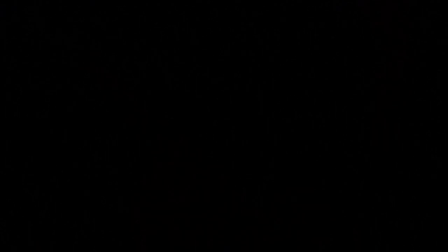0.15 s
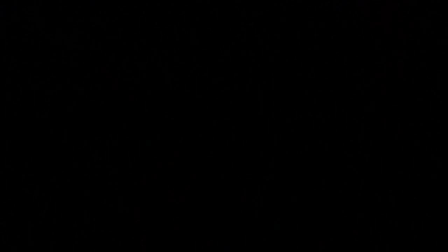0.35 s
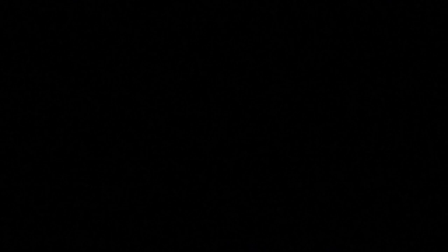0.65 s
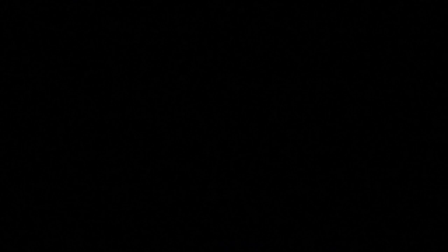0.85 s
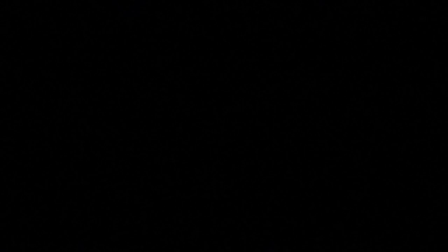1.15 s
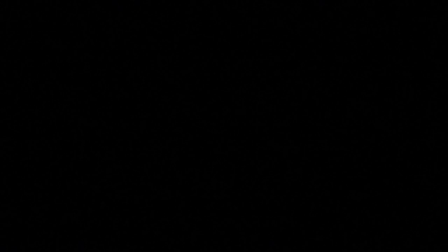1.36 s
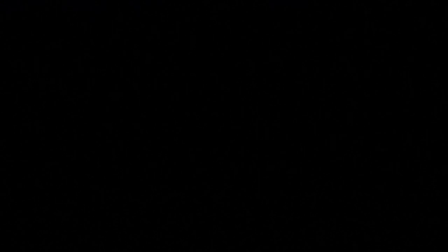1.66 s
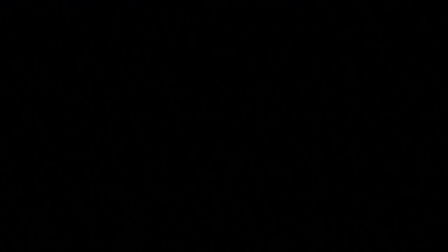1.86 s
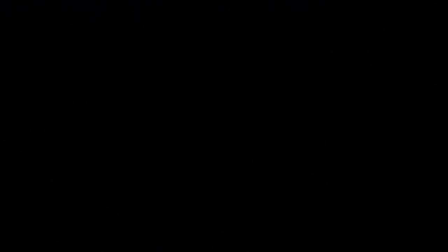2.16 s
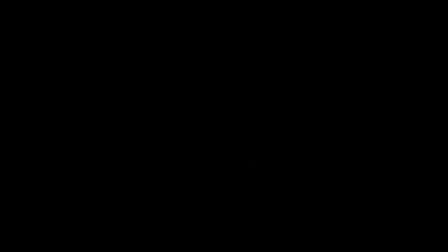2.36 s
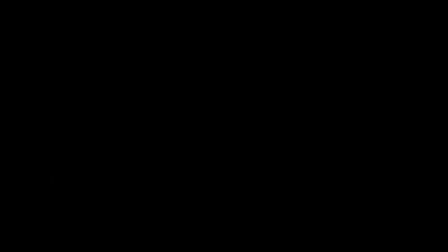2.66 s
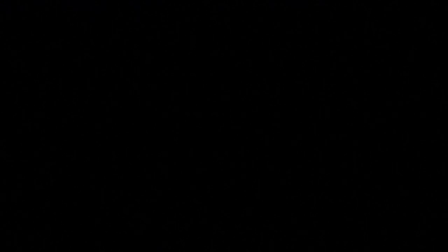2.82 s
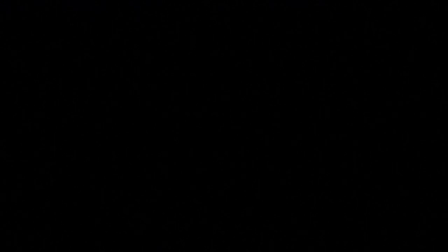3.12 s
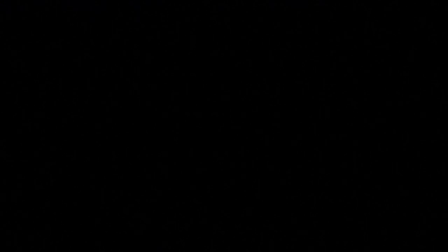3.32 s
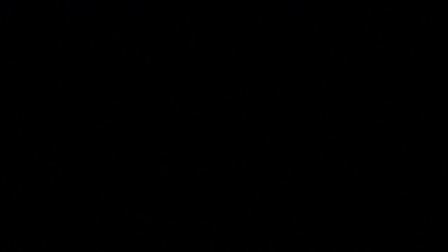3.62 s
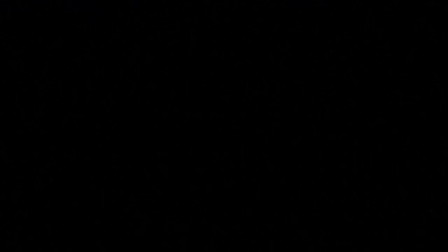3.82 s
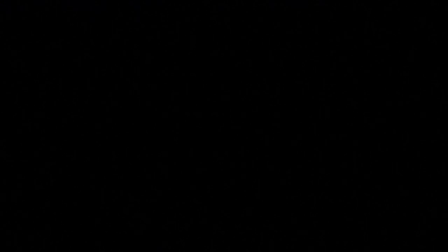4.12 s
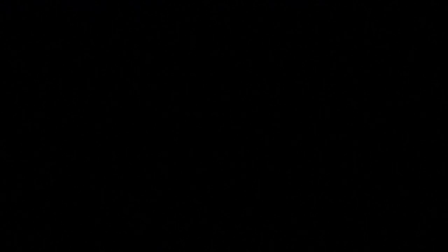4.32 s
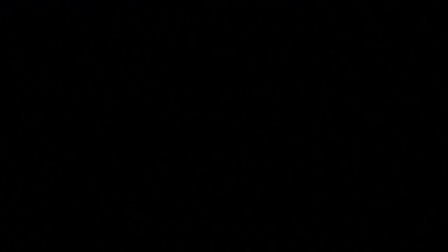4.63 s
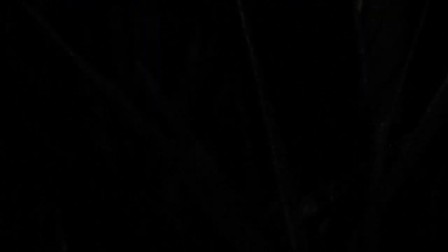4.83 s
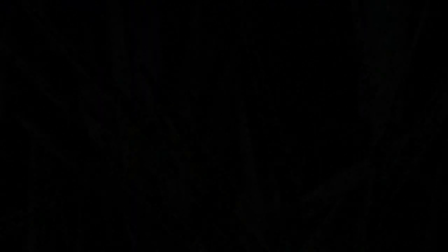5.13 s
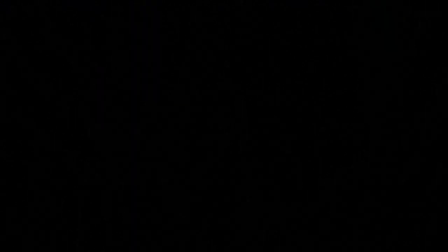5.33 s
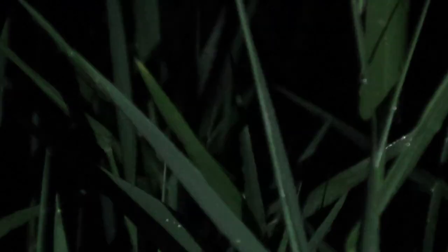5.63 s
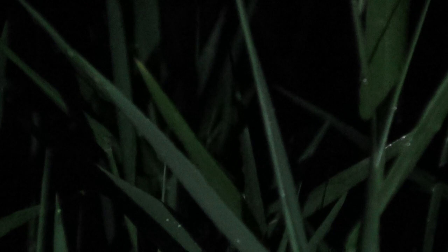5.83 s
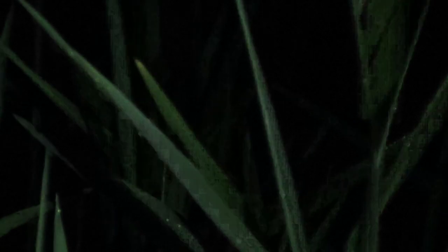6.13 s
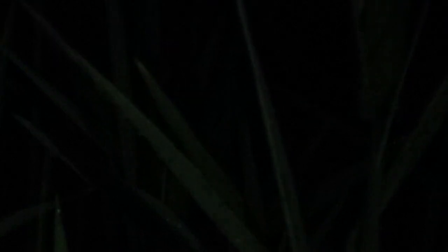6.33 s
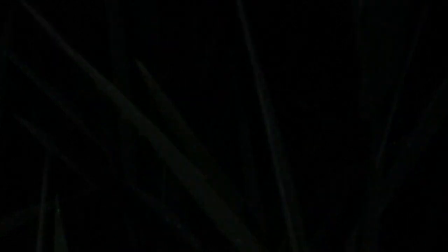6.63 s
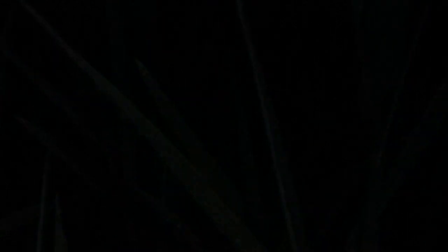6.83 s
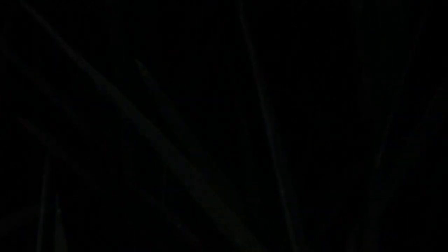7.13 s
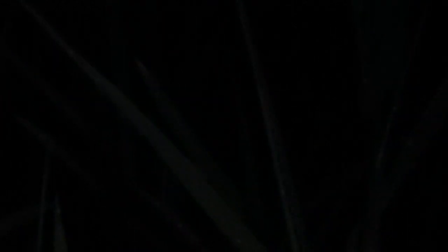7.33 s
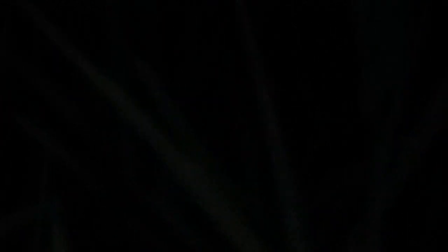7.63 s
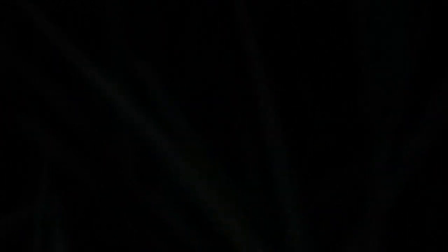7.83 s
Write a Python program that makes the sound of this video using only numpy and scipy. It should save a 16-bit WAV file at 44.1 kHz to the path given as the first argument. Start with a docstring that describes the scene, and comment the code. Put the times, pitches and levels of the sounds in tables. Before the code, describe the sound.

A frog chorus outdoors in the dark, heard from among the grass blades. Bursts of bright, dry clicking alternate with thinner moments of knocks, faint creaks and distant croaks. Two rounder, stronger knocks come around two seconds; busy click clusters follow, the last past seven seconds. Continuous high insect shimmer, small double cricket chirps, soft grass brushes and a weak distant engine drone surround them in wide, natural stereo.

```python
"""Frog chorus in wet grass at night: two-toned knocks (cord snaps, then a short harmonic tone), sharp
clicks alone and in rattles (short tone bursts), whoops and squeaks (gliding partials), creaks, rasps,
chirps and far calls (cord pulses ringing throat resonances), with echoes off the banks. Insects trill above
(throbbing noise bands, paired cricket tones); traffic, an engine sine and a late higher hum lie below,
among air and grass noise."""
import sys
import numpy as np
from scipy import signal
from scipy.fft import rfft, irfft
from scipy.io import wavfile

SR = 44100
rng = np.random.default_rng(int(sys.argv[2]) if len(sys.argv) > 2 else 0)


def materialize(psi):
    """Save the field psi as 16-bit PCM at rate SR to the path in sys.argv[1].

    A 1-D psi becomes a single channel; in a 2-D psi each row is a channel.
    """
    bounded = np.clip(np.atleast_2d(psi).T, -1, 1)
    quanta = np.round(bounded * 32767).astype(np.int16)
    wavfile.write(sys.argv[1], SR, quanta)


N = 351477

# night air spectrum: freq_hz, relative_db
AIR_SPECTRUM = [(200, -45), (300, -8.5), (630, -6), (1000, 1.5), (1500, -7), (2400, -6.5), (3300, -9.5),
                (4450, 1), (6500, 2.5), (8000, -7), (9500, -13), (12500, -16), (16000, -21)]
AIR_DB = -44
# stereo difference in noise: freq_hz, share of the common part
STEREO_DIFFERENCE = [(60, .03), (300, 0.1), (3000, 0.25), (8000, 0.27), (12000, 0.01)]
# steady insects: center_hz, width_hz, level_db, throb_hz, throb_depth (0-1), silent_from_s
INSECTS = [(5340, 440, -49, 83.0, 0.65, 9), (5920, 910, -49, 93, 0.5, 9), (5780, 1170, -52, 83.0, 0, 9),
           (7050, 110, -54.5, 50, 0.1, 9), (8410, 660, -51, 66, 0.2, 3.55), (10950, 1200, -63, 110, 0.6, 9),
           (3550, 860, -49, 25, 0.28, 9)]
# traffic spectrum: freq_hz, relative_db
TRAFFIC_SPECTRUM = [(12, -48), (20, -14), (32, -37), (54, -4), (128, -4), (161, -2), (300, -13.5),
                    (390, -81), (660, -120)]
# traffic loudness: time_s, level_db
TRAFFIC_LEVEL = [(0, -53), (.47, -57), (1.11, -52.5), (1.6, -56.5), (2.8, -47), (3.7, -52), (4.44, -49),
                 (5.5, -51), (6.3, -56), (7.4, -59), (7.97, -56.5)]
# far engine note, then a separate higher hum from 7.79 s: time_s, pitch_hz, level_db
ENGINE_THEN_HUM = [(0, 176.5, -60), (1.11, 169, -50), (1.55, 167.5, -56), (1.91, 167.5, -55),
                   (2.2, 166, -87), (2.751, 163.5, -61), (3.68, 162.6, -50), (3.75, 161.9, -71),
                   (4.15, 161, -74), (4.44, 160.2, -53.5), (5.52, 148.8, -56), (6.08, 147.5, -53.5),
                   (6.25, 144.9, -63), (7.35, 129.4, -59.5), (7.64, 117.6, -62), (7.75, 117.5, -78),
                   (7.79, 184.5, -61), (7.97, 186, -57)]
DRONE_HZ, DRONE_WIDTH_HZ, DRONE_DB = 65, 9.7, -61.5
# grass rustle spectrum: freq_hz, relative_db
RUSTLE_SPECTRUM = [(200, -55), (300, -5), (650, -9), (1500, -10.5), (4000, -31)]
RUSTLE_DB = -60
# brushes through the grass: start_s, length_s, level_db
SWISHES = [(.55, 0.46, -52), (3.15, 0.58, -50), (3.897, 0.183, -42.5), (5.396, 0.87, -55.5)]
WHINE_HZ, WHINE_DB = 15734, -74
# single clicks: time_s, level_db, pitch_hz, nominal_ms, left_right_db
CLICKS = [(0.0171, -25, 2600, 1.1, 6), (.2822, -14, 3050, 1.9, 5), (.314, -17.5, 3040, 8, 11),
          (1.062, -27, 2620, 2.0, 3), (1.199, -12, 2790, 1.2, 0), (1.2656, -16, 2680, 1.6, -3),
          (2.421, -14, 2980, 4.8, 11), (2.453, -11, 3030, 6, 11), (2.613, -12, 2920, 3.4, 8),
          (2.6413, -11.5, 3014, 8.5, 3), (3.5546, -13, 3230, 3.7, 4.5), (4.132, -23, 2570, 4.9, 7),
          (4.1439, -11.5, 2910, 3, 9), (4.1503, -14.5, 3300, 0.96, 1), (4.228, -15, 2790, 5.7, 6),
          (4.2823, -11.5, 2880, 3.6, 8), (4.3, -12.5, 2990, 9, 4), (5.4677, -28, 2700, 1.95, 9),
          (5.5997, -9, 3000, 1.9, 6), (5.6352, -12.5, 2940, 1.3, 8), (5.7637, -20, 2570, 3.6, 5),
          (6.615, -24.5, 2600, 3.2, 8), (6.6322, -13, 2780, 4.7, 8), (6.9234, -29.5, 2550, 4.4, 2),
          (7.2481, -17, 2455, 2.1, 2), (7.407, -26, 2950, 2.5, 0)]
# even runs of clicks: first_s, last_s, count, first_db, last_db, first_hz,
# first_nominal_ms, last_nominal_ms, left_right_db
RATTLES = [(0.227, 0.2727, 5, -14.5, -14.5, 2745, 5.5, 5.4, -2),
           (0.342, .3903, 6, -22, -13.5, 2910, 4.5, 6, -.5),
           (1.2194, 1.242, 3, -11, -20, 2900, 1.9, 4.2, -1),
           (1.2854, 1.306, 3, -12.5, -12, 2780, 3.1, 4, -2.3),
           (1.33, 1.3723, 5, -11, -11.5, 2900, 6.5, 5.5, 1.8),
           (1.3142, 1.3246, 2, -15, -11, 2880, 4.5, 3, 13),
           (1.446, 1.457, 2, -17.5, -12.5, 2880, 6.3, 7.3, -1),
           (1.478, 1.485, 2, -8, -10.5, 2954, 3.8, 7.3, -1),
           (1.798, 1.871, 7, -21.5, -27, 2850, 1.0, 2.3, 8),
           (2.3714, 2.4135, 5, -15, -13.5, 2690, 2.4, 4.7, 7.5),
           (2.464, 2.5195, 6, -21, -11, 2890, 5.2, 6, 6), (2.913, 2.974, 6, -30, -29.5, 2820, 2, 3.1, 8),
           (3.5243, 3.5344, 2, -21, -19, 2900, 1.7, 1.5, 7),
           (4.1586, 4.17, 2, -16.5, -14.5, 2985, 9.9, 8.7, 7),
           (4.192, 4.202, 2, -19, -18, 3260, 2.6, 2.1, 4), (5.742, 5.75, 2, -19, -14, 2890, 5.6, 7, 6.5),
           (5.7687, 5.7797, 2, -11.5, -12.5, 2965, 6.3, 6.2, 5),
           (5.793, 5.801, 2, -21, -21, 2910, 4.3, 3.3, -1),
           (7.0972, 7.1865, 9, -9, -12.5, 2750, 1.6, 6.4, -1.5),
           (7.275, 7.2827, 2, -12, -8.5, 2926, 5.1, 3.9, -1),
           (7.299, 7.32, 3, -13, -11, 2963, 7.4, 7.6, -1.3)]
RATTLE_CLIMB_HZ = 31.4   # per click
ECHO_T60_S, ECHO_DB, SLAP_S, SLAP_DB = 0.35, -10, 0.031, -26
# creaks: start_s, middle_s, end_s, start_db, middle_db, end_db,
# first_pulses_per_s, last_pulses_per_s, first_throat_hz, left_right_db, roughness
CREAKS = [(.02, 0.107, 0.22, -35.5, -22.5, -27.5, 425.5, 439.6, 2760, 5.3, 1.01),
          (1.075, 1.16, 1.243, -29, -23, -27, 408.6, 398, 2686, 5, .75),
          (2.22, 2.318, 2.41, -41.5, -35, -41, 432, 420, 2690, 8.5, 1.1),
          (3.01, 3.185, 3.42, -43.5, -36.5, -41, 340.5, 174.7, 2970, 7, 1.1),
          (3.9, 3.99, 4.15, -30, -23.5, -41, 420, 392, 2796, 7.3, 1.03),
          (5.48, 5.509, 5.57, -32.5, -27, -27, 476.6, 473.3, 2740, 9.5, 0.57),
          (5.549, 5.602, 5.68, -23, -28, -36, 418.7, 403, 2840, 6.3, 0.34),
          (5.655, 5.701, 5.745, -37.5, -36.5, -29, 173.7, 169, 2680, 3.6, 1.1),
          (6.335, 6.415, 6.45, -44, -30.5, -35, 384, 431.6, 2620, 9, 0.95),
          (6.435, 6.5, 6.56, -32, -38, -53, 211.5, 189.3, 2856, 7, 1),
          (7.61, 7.82, 8.06, -43.5, -37, -41, 329.4, 351, 2980, 6.8, 1.04)]
# creak resonances: multiple of throat_hz, width_hz, level_db
CREAK_RING = [(1.0, 349, 1.5), (.71, 200, -12.5), (.85, 110, -13)]
CREAK_CLIMB_HZ_PER_S = 1340
CREAK_JITTER, CREAK_ROUGH_DB = .03, 2.5   # at roughness 1; jitter is a share of the pulse interval
# whoops and pips: start_s, level_db, start_hz, target_hz, length_ms, overtone_db, left_right_db
WHOOPS = [(.045, -30.5, 708, 1055, 54, 5, -2), (.125, -28.5, 698, 1010, 51, -12, 4),
          (.655, -30, 728, 970, 51, -12, 5), (1.385, -42.5, 670, 687, 36, -20, 3),
          (3.094, -29.5, 702, 984, 60, -12, 4), (3.53, -31, 690, 1026, 41, -3, -2),
          (7.767, -35, 990, 1060, 8.7, -31, 5), (7.859, -28.5, 1125, 1164, 11.5, -30, 2),
          (7.95, -26.5, 1130, 1180, 12.5, -29, 2)]
# rasp curves: time_s, level_db, pulses_per_s, throat_hz, left_right_db
RASPS = [
    [(.045, -33, 148, 3980, 4), (.12, -33, 104, 4250, 3), (.2, -26.5, 136, 4460, 3.1),
     (.27, -26, 160.7, 4570, 4), (.33, -24.5, 269, 4870, 3.5), (.42, -24.5, 238.9, 5130, 3.2),
     (.445, -21.5, 347, 5140, 3.3), (.535, -24, 330, 5340, 3), (.554, -22.5, 404, 4855, 3.1)],
    [(.627, -31, 320, 4360, 3.5), (.638, -20, 320, 5130, -2), (.648, -21.5, 312, 5290, 0)],
]
# rasp resonances: multiple of throat_hz, width_hz, level_db
RASP_RING = [(1.017, 434, 1), (0.518, 254, -10), (0.816, 250, -12.5), (1.17, 600, -9.5), (1.87, 790, -17.5),
             (2.1, 1300, -22)]
# high chirps: start_s, peak_s, level_db at the peak
HIGH_CHIRPS = [(.262, .32, -26), (.965, 1.001, -41), (1.325, 1.39, -27.5), (4.142, 4.197, -26)]
# chirp onset: db_re_peak, pulses_per_s, throat_hz
CHIRP_START = (-8, 240, 5350)
# chirp from its peak on: s_after_peak, db_re_peak, pulses_per_s, throat_hz
CHIRP_FALL = [(0, 0.5, 330, 5950), (.04, -10, 340, 6050), (.09, -21, 340, 6050)]
# chirp resonances: multiple of throat_hz, width_hz, level_db
CHIRP_RING = [(1.001, 333, 1.5), (1.12, 380, -5)]
BUZZ_LEAD_S, BUZZ_TAIL_S, BUZZ_PULSES_PER_S = .014, .016, 260
# buzz level at start, peak, end: db_re_chirp_peak
BUZZ_DB = (-20.5, -18, -25)
# buzz base frequency at start, peak, end: base_hz
BUZZ_HZ = (9830, 9250, 9450)
# buzz resonances: multiple of base_hz, width_hz, level_db
BUZZ_RING = [(1.03, 240, 2.5), (.91, 230, 0), (.8, 320, 0), (1.27, 1800, -4), (1.63, 300, -12)]
# knocks by frog: time_s, level_db, pitch_hz (nominal)
KNOCKS = {"bright": [(.747, -27.5, 920), (1.456, -29, 932), (3.278, -27, 930), (3.818, -26.5, 923),
          (4.497, -27.5, 932), (6.093, -27.5, 922), (6.702, -28, 927), (7.423, -27.5, 907)],
          "long": [(.468, -35, 950), (.897, -29, 948), (1.804, -28, 969), (2.878, -29.5, 942),
          (3.136, -32, 940), (3.714, -30, 948), (4.283, -30.5, 947), (5.268, -30.5, 948),
          (5.947, -29.5, 951), (6.401, -30.5, 951), (7.577, -28.5, 977)], "high": [(.435, -35, 1020),
          (1.673, -31, 1037), (3.316, -30.5, 1034), (4.802, -32, 1026), (6.935, -32, 1017)],
          "dull": [(.592, -30, 934), (1.776, -30.5, 935), (4.263, -27.5, 949), (6.124, -32.5, 922),
          (7.1, -30.5, 920)], "round": [(1.996, -21.5, 998), (2.157, -18.5, 977)],
          "hollow": [(.864, -44, 920), (1.985, -17.5, 957), (3.487, -37, 999)],
          "aside": [(.826, -35.5, 920), (1.331, -47, 987), (2.194, -36.5, 930), (4.558, -36.5, 980),
          (6.636, -34.5, 938)]}
# voice by frog: partial_2_db, left_right_db, partial_3_db, length_ms, snap_db, bend (share of pitch_hz)
KNOCKERS = {"bright": (11, -2, -7, 26.5, 2, 0.05), "long": (8.5, 0, -14.5, 32.5, 3, 0.05),
            "high": (12, 3, -6, 24.5, -4, 0.03), "dull": (4, -1, -9, 34.5, 2.5, 0.06),
            "round": (-0.5, -2.8, -9.5, 17, -3, 0), "hollow": (-1, 3, -18, 26, -3.5, 0.04),
            "aside": (4, 9, -8, 31.5, 2.5, .085)}
# rasping frog's squeaks: start_s, level_db, start_hz, target_hz, length_ms, octave_db
SQUEAKS = [(0.542, -18, 2560, 2320, 9.4, -15), (.633, -23.5, 2528, 2670, 29.5, 10)]
# cricket double chirps: start_s
CRICKET_TIMES = [.9103, 1.1313, 1.6945, 2.0133, 2.1989, 2.6653, 2.958, 3.2794, 3.5644, 3.9774, 4.3544,
                 4.6857, 4.9736, 5.3388, 5.4889, 5.9279, 6.2627, 6.5694, 6.8628, 7.5717]
CRICKET_HZ, CRICKET_MS, CRICKET_REPEAT_S, CRICKET_DB = 6440, 25, .036, -39.5
# far calls: start_s, peak_s, end_s, level_db at the peak, throat_hz; an end before the peak cuts the swell
FAR_CALLS = [(1.125, 1.18, 1.2, -34.5, 3920), (1.931, 1.94, 2.0, -41, 3900),
             (2.049, 2.085, 2.11, -35.5, 3790), (2.469, 2.58, 2.57, -42, 3900),
             (3.66, 3.706, 3.8, -44, 4070), (4.005, 4.065, 4.17, -35.5, 3950),
             (4.698, 4.76, 4.85, -46.5, 3850), (4.964, 5.033, 5.08, -45.5, 4080),
             (5.74, 5.752, 5.78, -37, 3906), (6.48, 6.485, 6.62, -42, 3730),
             (7.3, 7.305, 7.34, -36.5, 3820), (7.45, 7.466, 7.5, -33, 3810), (7.87, 7.923, 7.9, -42, 3960)]
FAR_PULSES_PER_S, FAR_PAN_DB = 140, -1.0
FAR_START_DB, FAR_END_DB = -10.5, -15   # re peak
# twigs and grass: time_s, level_db, pitch_hz, width_hz
TICKS = [(4.003, -22, 1310, 500), (4.022, -22.5, 1310, 500), (4.053, -22.5, 1320, 500),
         (4.079, -29.5, 450, 198.2), (5.607, -13, 1330, 1480), (6.218, -31, 228, 122),
         (7.247, -27, 5900, 6000), (7.275, -16, 6200, 3500)]
# broad creak curve: time_s, level_db, pulses_per_s, throat_hz, left_right_db
WIDE_CREAK = [
    [(6.945, -47, 206, 5100, 0.59), (7.001, -41.5, 250, 5040, 2.0), (7.097, -40, 183, 5300, 1),
     (7.15, -50, 220, 5200, 0.0)],
]
# broad creak resonances: multiple of throat_hz, width_hz, level_db
WIDE_RING = [(0.92, 1830, 3.5), (0.537, 306, 5.5), (0.482, 275, 3.5), (1.1, 3500, -3)]
# phase between microphone ports: freq_hz, left_lead_rad
PORT_LEAD = [(30, .1), (125, 0.23), (300, 0.77), (600, 1.2), (1290, 1.07), (3700, 0.8), (5600, 0.62),
             (8800, 0.28), (12000, 0.021)]
STOPBAND_HZ = 16150


def amp(db):
    """Decibels to amplitude."""
    return 10 ** (np.asarray(db) / 20)


def rms_one(x):
    """Scales to rms 1."""
    return x / np.sqrt(np.mean(x ** 2) + 1e-20)


def at_hz(points):
    """Reads (freq_hz, value) points at every FFT bin, on a log frequency axis."""
    hz, value = np.transpose(points)
    return np.interp(np.log(np.fft.rfftfreq(N, 1 / SR) + 1), np.log(hz), value)


def add(out, start_s, sound, pan_db):
    """Mixes in a mono sound; pan_db is left minus right."""
    i = round(start_s * SR)
    sound = sound[:N - i]
    out[:, i:i + len(sound)] += sound * amp([[pan_db / 2], [-pan_db / 2]])


def noise(gain):
    """Stereo noise, gain per bin, rms 1; a second noise enters the sides with opposite sign."""
    shared, difference = rfft(rng.standard_normal((2, N)))
    sides = shared + at_hz(STEREO_DIFFERENCE) * difference * [[1], [-1]]
    return rms_one(irfft(gain * sides, N))


def drift(points_per_s):
    """Slow random wander, rms 1."""
    steps = np.arange(N) * points_per_s / SR
    return rms_one(np.interp(steps, np.arange(400), rng.standard_normal(400)))


def note(start_hz, target_hz, ms, partials, skew, arch=1.83, soft=0.56):
    """Swelling, fading tone of (multiple, db) partials; the glide turns back if arch exceeds pi/2."""
    u = np.linspace(0, 1, max(round(ms * SR / 1000), 8))
    glide_hz = start_hz + (target_hz - start_hz) * np.sin(arch * u)
    phase = 2 * np.pi * np.cumsum(glide_hz) / SR
    swell = np.abs(np.sin(np.pi * u ** skew)) ** soft
    return swell * sum(amp(db) * np.sin(k * phase + k) for k, db in partials)


def ring(hz, width_hz, rise=1.7):
    """Resonance that builds up and decays, envelope peak 1; larger rise starts softer."""
    t = np.arange(round(.014 * SR)) / SR
    x = 2 * np.pi * width_hz * t
    return np.sin(2 * np.pi * hz * t) * (x / rise) ** rise * np.exp(rise - x)


def pulse_calls(out, calls, modes, jitter, rough_db, rise=2.02):
    """Cord pulses, uneven in time and level, each ring the throat modes."""
    for call in calls:
        time_s, *columns = np.transpose(call)
        t = time_s[0]
        for size, late in np.clip(rng.standard_normal((250, 2)), -2, 2):
            if t < min(time_s[-1], N / SR):
                db, rate, hz, pan_db = [np.interp(t, time_s, c) for c in columns]
                rings = [ring(multiple * hz, width_hz, rise) for multiple, width_hz, _ in modes]
                pulse = sum(amp(mode_db) * r for r, (_, _, mode_db) in zip(rings, modes))
                # slower pulses are stronger at a given rms level
                even = np.sqrt(SR / rate / np.sum(rings[0] ** 2))
                add(out, t, amp(db + rough_db * size) * even * pulse, pan_db)
                t += (1 + jitter * late) / rate


def night_air():
    """Steady shaped noise."""
    return amp(AIR_DB) * noise(amp(at_hz(AIR_SPECTRUM)))


def insects():
    """Far singers as noise bands, most throbbing at a wing rate, all drifting in level."""
    t, f, out = np.arange(N) / SR, np.fft.rfftfreq(N, 1 / SR), 0
    for hz, width_hz, db, throb_hz, depth, silent_s in INSECTS:
        band = noise(1 / (1 + (2 * (f - hz) / width_hz) ** 4))
        throb = 1 + depth * np.sin(2 * np.pi * throb_hz * t)
        fade = np.clip((silent_s - t) / 0.027, 0, 1)
        out = out + amp(db + 2.1 * drift(4.6)) * band * throb * fade
    return out


def traffic():
    """Low shaped noise, slowly varying in level."""
    level_db = np.interp(np.arange(N) / SR, *np.transpose(TRAFFIC_LEVEL))
    return amp(level_db) * noise(amp(at_hz(TRAFFIC_SPECTRUM)))


def engine_then_hum():
    """Engine sine that comes and goes and sinks in pitch; a separate higher hum enters near the end."""
    t = np.arange(N) / SR
    time_s, pitch_hz, level_db = np.transpose(ENGINE_THEN_HUM)
    phase = 2 * np.pi * np.cumsum(np.interp(t, time_s, pitch_hz)) / SR
    return np.sqrt(2) * amp(np.interp(t, time_s, level_db)) * np.sin(phase)


def drone():
    """Low hum: narrow-band noise."""
    f = np.fft.rfftfreq(N, 1 / SR)
    return amp(DRONE_DB) * noise(1 / (1 + (2 * (f - DRONE_HZ) / DRONE_WIDTH_HZ) ** 2))


def rustle():
    """Grass noise: a faint bed plus brushes that swell and fade."""
    t, level = np.arange(N) / SR, amp(RUSTLE_DB)
    for start_s, length_s, db in SWISHES:
        swell = np.abs(np.sin(np.pi * np.clip((t - start_s) / length_s, 0, 1))) ** 0.31
        level = level + amp(db) * swell * (t < start_s + length_s)
    return level * noise(amp(at_hz(RUSTLE_SPECTRUM)))


def whine():
    """Thin steady high sine."""
    return np.sqrt(2) * amp(WHINE_DB) * np.sin(2 * np.pi * WHINE_HZ * np.arange(N) / SR)


def rattle_clicks():
    """Rattles as click rows: evenly spaced, climbing in pitch."""
    rows = []
    for first_s, last_s, count, first_db, last_db, hz, first_ms, last_ms, pan_db in RATTLES:
        for k, u in enumerate(np.linspace(0, 1, round(count))):
            time_s = first_s + u * (last_s - first_s)
            db = first_db + u * (last_db - first_db)
            ms = first_ms + u * (last_ms - first_ms)
            rows.append((time_s, db, hz + RATTLE_CLIMB_HZ * k, ms, pan_db))
    return rows


def clicks(out):
    """Quick-starting tone burst with a duller snap, weaker in long clicks."""
    for time_s, db, hz, ms, pan_db in CLICKS + rattle_clicks():
        burst = note(1.048 * hz, 1.068 * hz, 1.84 * ms, [(0.94, 0.024)], skew=0.46, soft=2.24)
        add(out, time_s - .0005, amp(db) * burst, pan_db)
        add(out, time_s - .001, amp(db - 7 - 1.2 * ms) * ring(2250, 330, rise=3), pan_db)


def echoes(dry):
    """Decaying scatter from stems and water, plus one slap off a bank."""
    t = np.arange(SR // 2) / SR
    scatter = rng.standard_normal(len(t)) + 0.36 * rng.standard_normal((2, len(t)))
    tail = scatter * amp(-60 * t / ECHO_T60_S) * np.clip(t / 0.0022, 0, 1)
    tail = amp(ECHO_DB) * tail / np.sqrt(np.sum(tail ** 2, axis=1, keepdims=True))
    tail[:, round(SLAP_S * SR)] += amp(SLAP_DB)
    return signal.fftconvolve(dry, tail, axes=1)[:, :N]


def creaks(out):
    """Throat resonance climbs while level and pulse rate slide."""
    for (start, middle, end, start_db, middle_db, end_db,
         first_rate, last_rate, hz, pan_db, rough) in CREAKS:
        call = []
        for s, db in [(start, start_db), (middle, middle_db), (end, end_db)]:
            rate = np.interp(s, [start, end], [first_rate, last_rate])
            call.append((s, db, rate, hz + CREAK_CLIMB_HZ_PER_S * (s - start), pan_db))
        pulse_calls(out, [call], CREAK_RING, CREAK_JITTER * rough ** 2, CREAK_ROUGH_DB * rough)


def whoops(out):
    """Soft upward glides with an overtone at 1.45 times the pitch."""
    for start_s, db, start_hz, target_hz, ms, over_db, pan_db in WHOOPS:
        tone = note(start_hz, target_hz, ms, [(1, 0), (1.45, over_db)], skew=0.88, arch=1.07)
        add(out, start_s, amp(db) * tone, pan_db)


def rasps(out):
    """Faster-building pulses through a mostly rising throat resonance."""
    pulse_calls(out, RASPS, RASP_RING, jitter=.14, rough_db=2.5, rise=1.24)


def high_chirps(out):
    """Pulsed chirp climbs, then fades; a shrill pulsed buzz rides on its rise."""
    for start, peak, db in HIGH_CHIRPS:
        points = [(start - peak, *CHIRP_START)] + CHIRP_FALL
        chirp = [(peak + s, db + re_db, rate, hz, 1.3) for s, re_db, rate, hz in points]
        pulse_calls(out, [chirp], CHIRP_RING, jitter=0.25, rough_db=3.0)
        buzz_s = [start - BUZZ_LEAD_S, peak, peak + BUZZ_TAIL_S]
        buzz = [(s, db + re_db, BUZZ_PULSES_PER_S, hz, -1.2)
                for s, re_db, hz in zip(buzz_s, BUZZ_DB, BUZZ_HZ)]
        pulse_calls(out, [buzz], BUZZ_RING, jitter=.3, rough_db=3.5)


def knocks(out):
    """Two cord snaps, then the cords catch into a short harmonic tone, mostly bending up."""
    for frog, times in KNOCKS.items():
        second_db, pan_db, third_db, ms, snap_db, bend = KNOCKERS[frog]
        snap = note(2657, 1285, 4.12, [(0.896, second_db + .5), (0.55, 1.7)], skew=0.43, soft=2.9)
        partials = [(1, 0), (2, second_db), (3, third_db), (4, third_db - 13)]
        for time_s, db, hz in times:
            for delay_s in (0.00048, 0.00461):
                add(out, time_s + delay_s, amp(db + snap_db) * snap, pan_db)
            tone = note((1.035 - bend) * hz, 1.035 * hz, ms, partials, skew=0.49, arch=1.92, soft=0.86)
            add(out, time_s + .005, amp(db + 2.5) * tone, pan_db)


def squeaks(out):
    """Gliding tone and octave, throbbing at 195 Hz."""
    for start_s, db, start_hz, target_hz, ms, octave_db in SQUEAKS:
        tone = note(start_hz, target_hz, ms, [(1, 0), (2, octave_db)], skew=1.09, arch=1.96, soft=0.53)
        throb = 1 + 0.26 * np.sin(2 * np.pi * 195 * np.arange(len(tone)) / SR)
        add(out, start_s, amp(db) * tone * throb, 3.5)


def cricket(out):
    """Paired steady-pitch chirps."""
    chirp = amp(CRICKET_DB) * note(CRICKET_HZ, CRICKET_HZ, CRICKET_MS, [(1, 0.0048)], skew=0.52)
    for start_s in CRICKET_TIMES:
        add(out, start_s, chirp, 1.5)
        add(out, start_s + CRICKET_REPEAT_S, chirp, 1.5)


def far_calls(out):
    """Distant frogs: fixed mean pulse rate and throat resonance, swelling and fading."""
    calls = []
    for start, peak, end, db, hz in FAR_CALLS:
        points = [(start, FAR_START_DB), (peak, 0), (end, FAR_END_DB)]
        calls.append([(s, db + re_db, FAR_PULSES_PER_S, hz, FAR_PAN_DB) for s, re_db in points])
    pulse_calls(out, calls, [(0.98, 117, 1.3), (0.96, 330, 5.3)], jitter=0.26, rough_db=-0.5)


def grass_ticks(out):
    """Twigs and grass: single damped rings."""
    for time_s, db, hz, width_hz in TICKS:
        add(out, time_s, amp(db) * ring(hz, width_hz, rise=2.8), 0.)


def wide_creak(out):
    """Nearly regular pulses through broad throat resonances."""
    pulse_calls(out, WIDE_CREAK, WIDE_RING, jitter=0.012, rough_db=2.0)


def scene():
    """Calls and ticks with echoes, over insects and background."""
    calls = np.zeros((2, N))
    for source in (clicks, creaks, whoops, rasps, high_chirps, knocks, squeaks,
                   cricket, far_calls, grass_ticks, wide_creak):
        source(calls)
    background = night_air() + drone() + traffic() + engine_then_hum() + rustle() + whine()
    return calls + echoes(calls) + insects() + background


def record(dry):
    """Two microphone ports differ in phase; a steep low-pass cuts the top."""
    ports = irfft(rfft(dry) * np.exp(.5j * at_hz(PORT_LEAD) * [[1], [-1]]), N)
    return signal.sosfilt(signal.cheby2(14, 70, STOPBAND_HZ, fs=SR, output="sos"), ports)


dry = scene()
out = record(dry)
materialize(out)
```